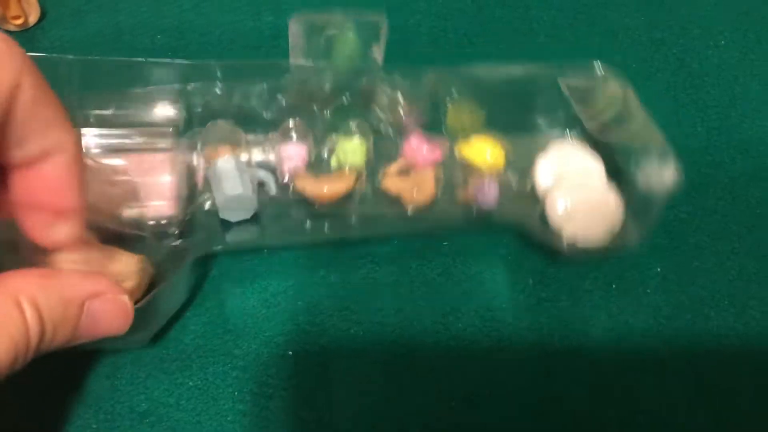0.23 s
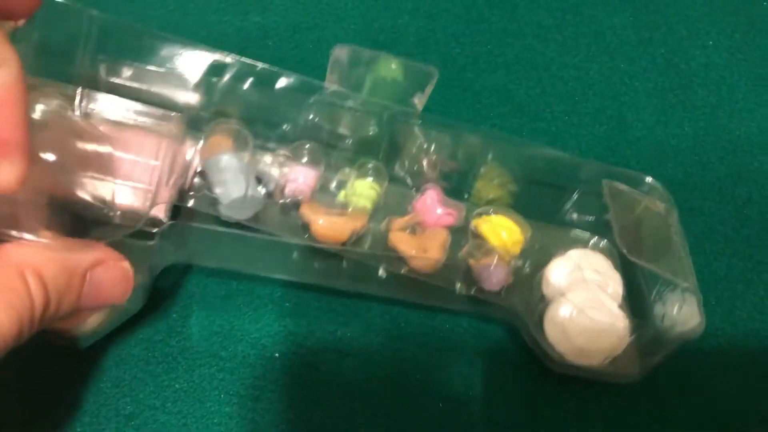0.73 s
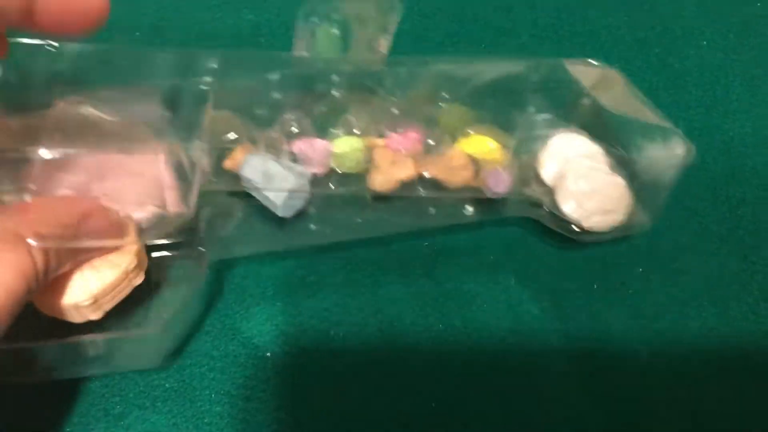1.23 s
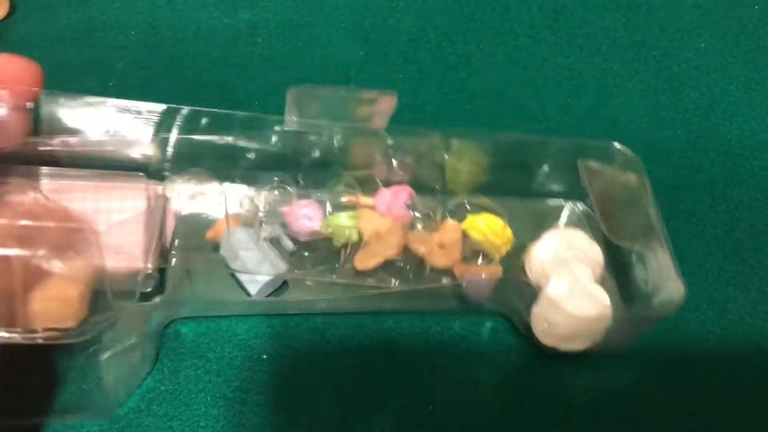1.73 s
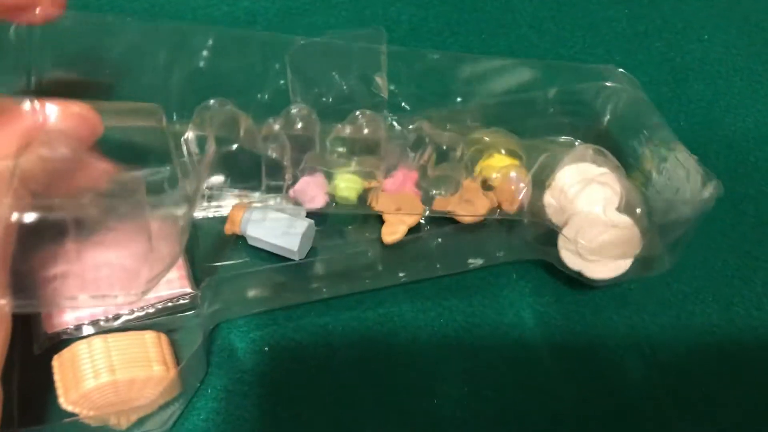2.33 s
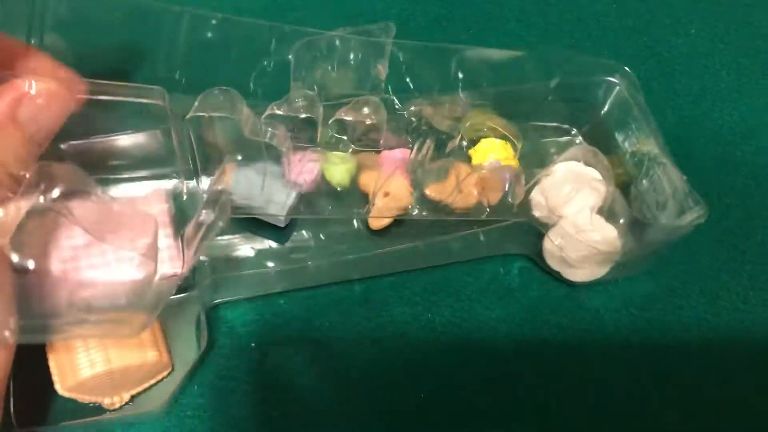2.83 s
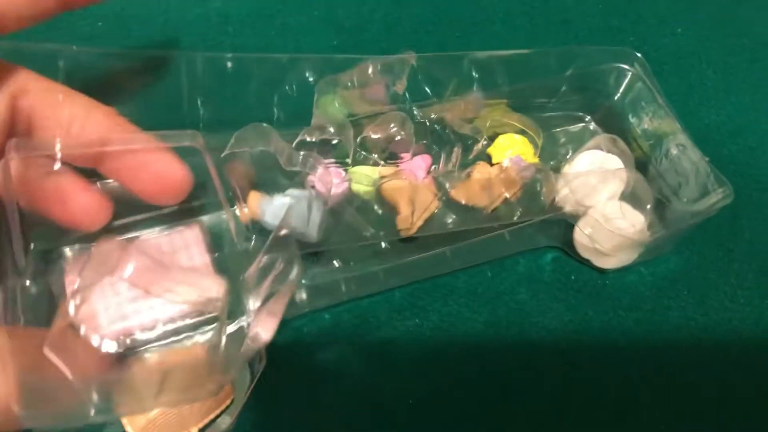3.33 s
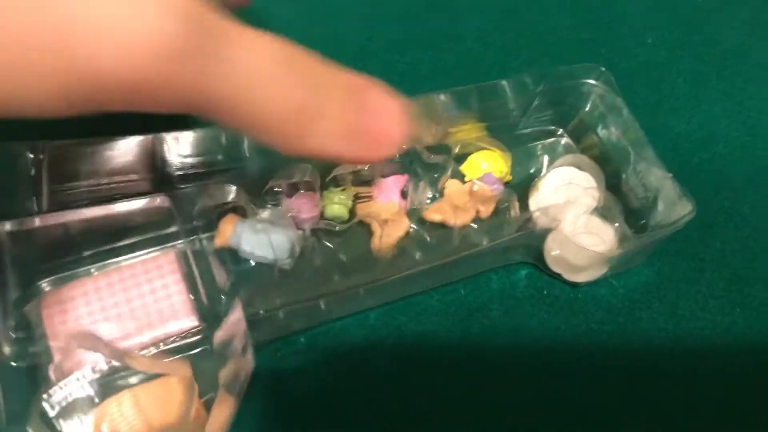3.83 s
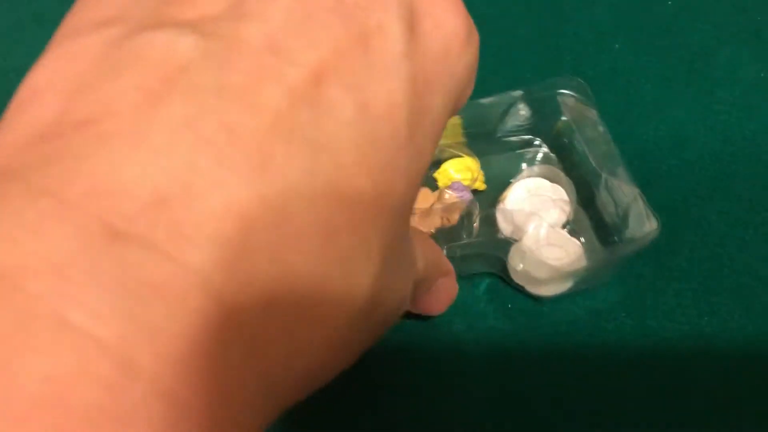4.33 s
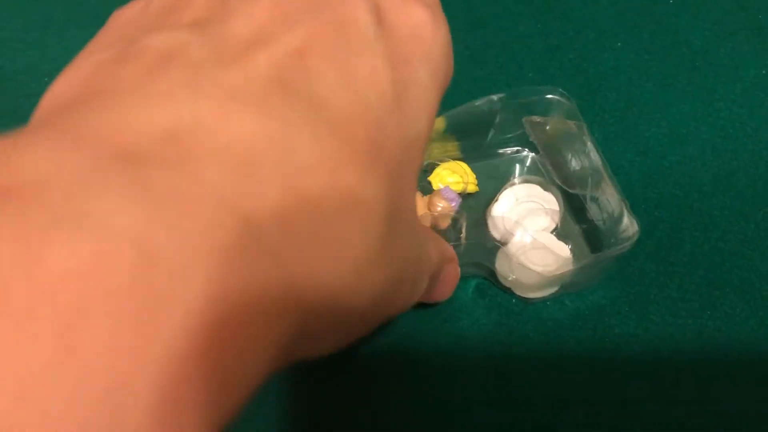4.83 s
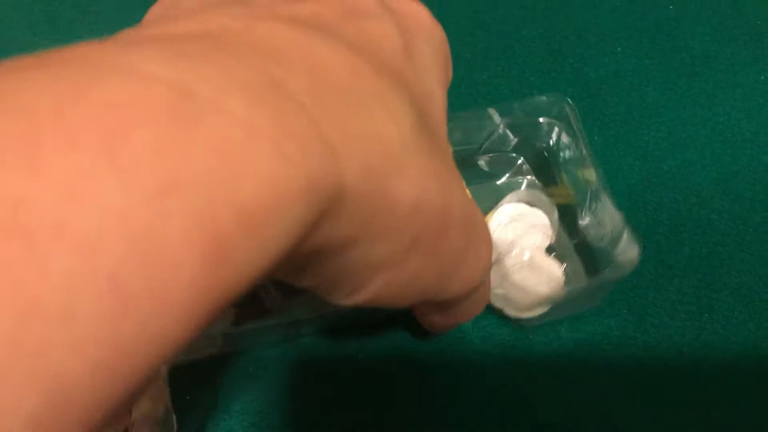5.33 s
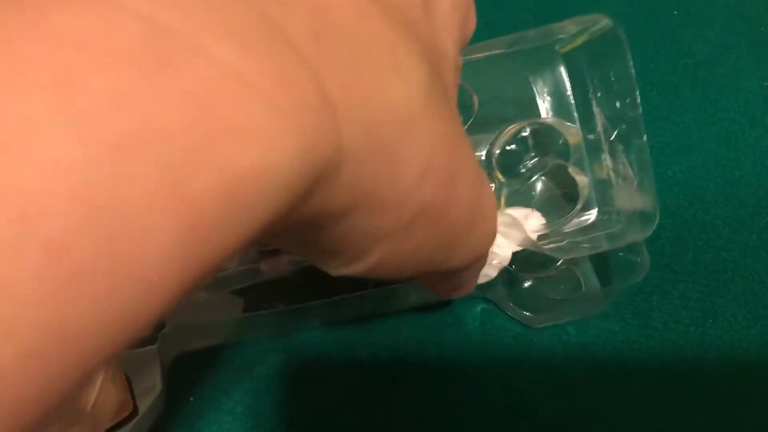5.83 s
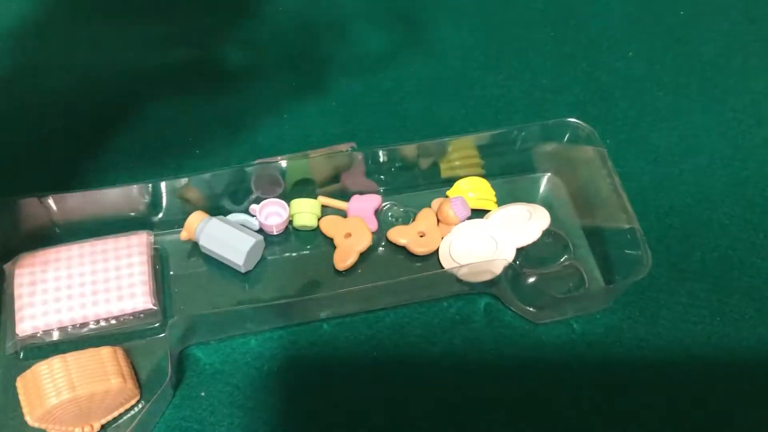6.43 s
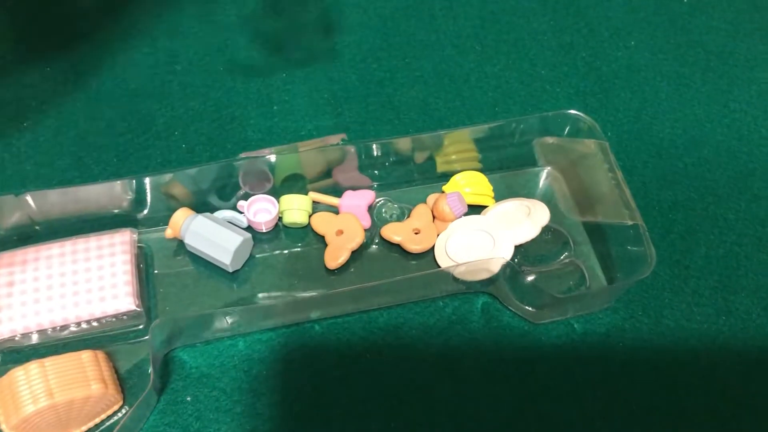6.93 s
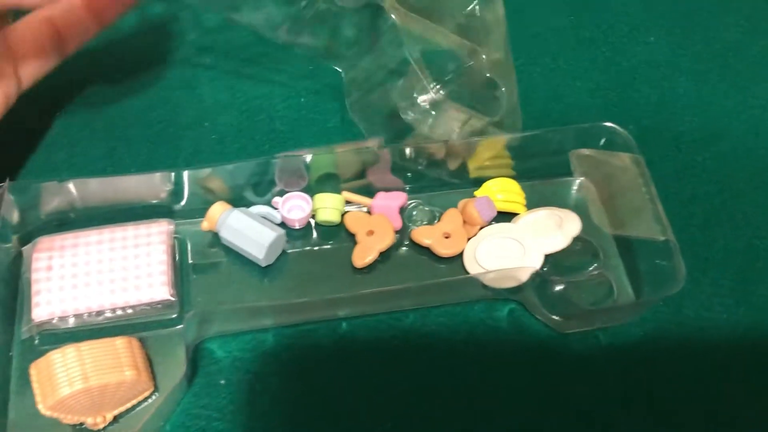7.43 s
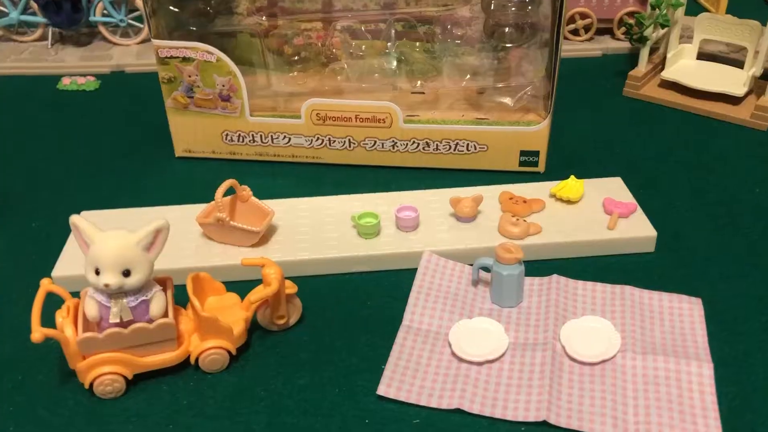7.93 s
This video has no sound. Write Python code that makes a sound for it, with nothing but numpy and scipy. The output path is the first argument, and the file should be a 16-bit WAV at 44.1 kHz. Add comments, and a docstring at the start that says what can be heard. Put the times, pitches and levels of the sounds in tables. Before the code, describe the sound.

A stiff, thin plastic sheet crackles and buckles under fingers on a felt-covered table, heard dry and close with little room tail. Bright pops with a short hollow ring stand out from uneven crinkling. The handling grows sparse, picks up again as the lid is pried loose, then nearly stops. Faint air and a low drone lie beneath; a brief scuff and dull knock come last.

```python
"""Prising open a plastic blister tray

Hands prise the lid off a thin plastic tray of small toy pieces, on a felt-covered table in a small room.
The sheet buckles: sharp snaps are bursts of dense modes with a ringing pocket, crinkles are many tiny bursts.
Its rims stick, slip and squeak as pulses into a resonance, and the loose lid slides as comb-filtered noise.
A click of shaped noise with a short hollow knock of a few modes ends the handling, over faint air and drone."""
import sys
import numpy as np
from scipy import signal
from scipy.fft import rfft, irfft, next_fast_len
from scipy.io import wavfile
from scipy.ndimage import uniform_filter1d

SR = 44100
rng = np.random.default_rng(int(sys.argv[2]) if len(sys.argv) > 2 else 0)


def bounce(signal):
    """Save signal as a 16-bit WAV file at the path given by the first command-line argument."""
    frames = np.transpose(np.atleast_2d(signal))
    limited = np.clip(frames, -1, 1)
    pcm = np.round(limited * 32767).astype(np.int16)
    wavfile.write(sys.argv[1], SR, pcm)


N = 360341
TIME = np.arange(N) / SR
BANDS = np.geomspace(90, 15000, 16)  # centres of the sheet's frequency bands, Hz

# The hollow note of the part under the fingers. Each row: time in seconds, pitch in Hz.
HOLLOW_NOTE = [(.45, 1810), (.7, 1110), (1.05, 1310), (1.15, 2160), (1.9, 1310), (2.3, 1780), (2.8, 1300),
               (3.02, 1640), (3.6, 1260), (5.1, 1230), (5.35, 1520), (5.5, 1222), (7.3, 940)]


def amp(db):
    """Decibels to gain."""
    return 10 ** (np.asarray(db) / 20)


def unit(x):
    """Scales to rms 1."""
    return x / np.sqrt(np.mean(x ** 2) + 1e-30)


def read(points, hz):
    """Reads a table on a log-frequency axis."""
    f, value = np.transpose(points)
    return np.interp(np.log(hz + 1), np.log(f + 1), value)


def curves(rows):
    """Each column of a table of times, at every sample."""
    s, *columns = np.transpose(rows)
    return [np.interp(TIME, s, column) for column in columns]


def add(mix, s, sound):
    """Mixes a sound in at a time."""
    part = mix[max(round(s * SR), 0):][:len(sound)]
    part += sound[:len(part)]


def shares(centres, hz):
    """Overlapping triangles on log frequency, one a centre, that sum to 1."""
    return np.array([read(np.c_[centres, peak], hz) for peak in np.eye(len(centres))])


def coloured(x, spectrum):
    """Gives a signal a spectrum."""
    padded = next_fast_len(N)
    gain = amp(read(spectrum, np.fft.rfftfreq(padded, 1 / SR)))
    return irfft(rfft(x, padded) * gain, padded)[:N]


def resonate(x, hz, width):
    """A resonance of gain 1 at its centre: one complex pole, the width in Hz."""
    r = np.exp(-np.pi * width / SR)
    return 2 * signal.lfilter([1 - r], [1, -r * np.exp(2j * np.pi * hz / SR)], x).real


def swell(t, s, rise_s, hold_s, release_s):
    """Level in dB of a hand movement: it builds up until s, holds, and relaxes."""
    fall_db, shape = 22.5, 1.218  # drop one rise or release time away; a shape above 1 rounds the peak
    away = np.maximum((s - t) / rise_s, (t - s - hold_s) / release_s)
    return -fall_db * np.clip(away, 0, 8) ** shape


def background():
    """Faint room air as coloured noise, and a low drone as narrow noise that wavers in level."""
    # Low wavering drone. Each row: resonance in Hz, width of each of two passes in Hz, level in dB.
    hum = [(67.5, 4.9, -67.5), (238, 11, -74)]
    # How the drone swells and sinks. Each row: time in seconds, gain in dB.
    drone_level = [(0, 7), (1, 6.5), (2.6, 0.5), (3.2, -1), (4.2, -1), (5.5, 4.5), (6.4, -2.5), (7.4, 0),
                   (8.17, -3.5)]
    # Spectrum of the air. Each row: frequency in Hz, relative density in dB per Hz.
    air_colour = [(25, -23), (60, -2.5), (130, -3.5), (250, -11.5), (500, -14), (1000, -18), (3200, -26.5),
                  (8000, -31), (16000, -39.5)]
    air_db = -69
    drone = np.zeros(N)
    for hz, width, db in hum:
        narrow = resonate(resonate(rng.standard_normal(N), hz, width), hz, width)
        drone += amp(db) * unit(narrow)
    air = unit(coloured(rng.standard_normal(N), air_colour))
    return drone * amp(curves(drone_level)[0]) + amp(air_db) * air


def band_gains(thump_db, crack_db, fizz_db):
    """The sheet's spectrum, tinted, as gains (bands, moments) of total power 1."""
    # Spectrum of the buckling sheet. Each row: frequency in Hz, relative density in dB per Hz.
    sheet_colour = [(35, -41), (60, -12), (91, -13.5), (268, -10), (354, -8), (398, -8), (593, -11),
                    (1110, 1.5), (1280, -1), (2520, -4), (3190, -2.5), (5330, -9.5), (6430, -10.5),
                    (9350, -16), (16000, -17.5)]
    # Where the tints act: thump, body (two points), crack and fizz, in Hz.
    tint_hz = [450, 1000, 2000, 4000, 10000]
    body_db = np.zeros_like(thump_db)
    tints = np.array([thump_db, body_db, body_db, crack_db, fizz_db])
    level_db = shares(tint_hz, BANDS).T @ tints + read(sheet_colour, BANDS)[:, None]
    gain = amp(level_db) * np.sqrt(np.gradient(BANDS))[:, None]  # density to band level
    return gain / np.linalg.norm(gain, axis=0)


def buckles(ring_s, damping=0.6, rise_cycles=0.68, rise_share=0.086, after_db=-29, after_s=0.012, size=2048):
    """Bursts (bursts, bands, samples) of energy 1 a band: dense sheet modes, the high ones starting and dying first."""
    t, hz, ring_s = np.arange(size) / SR, BANDS[:, None], ring_s[:, None, None]
    split = np.sqrt(shares(BANDS, np.fft.rfftfreq(size, 1 / SR)))
    noise = rng.standard_normal((len(ring_s), len(BANDS), size))
    modes = irfft(rfft(noise) * split)
    life = ring_s * (np.maximum(hz, 700) / 2500) ** -damping
    rise = 1 - np.exp(-(t / (rise_cycles / hz + rise_share * ring_s)) ** 2)
    decay = np.exp(-t / life) + amp(after_db) * np.exp(-t / after_s)
    burst = modes * rise * decay
    return burst / np.linalg.norm(burst, axis=2, keepdims=True)


def flexing(size=32):
    """How hard the sheet is worked (s, level dB, thump dB, brightness dB): pushes add up, the strongest weigh most."""
    # Pushes of the fingers, each building up and relaxing. Each row: peak in seconds, crinkle level in dB,
    # build-up in seconds, relaxing in seconds, thump in dB, brightness in dB.
    pushes = [(0.21, -41.5, 0.097, 0.23, -1, -7), (0.432, -34.5, 0.12, 0.17, 2.5, -1.5),
              (0.64, -47, 0.13, 0.37, 4, -3.5), (0.99, -37, 0.18, .12, -1, -3.5),
              (1.048, -27, 0.013, 0.18, 0, 0.5), (1.15, -34, 0.17, 0.12, -11, -9.5),
              (1.305, -47.5, 0.043, 0.045, -7, -13), (1.39, -41.5, 0.02, 0.25, 2, -1),
              (1.69, -34.5, 0.16, 0.16, 1.5, -5.5), (1.891, -29, 0.21, 0.13, 2.5, 1.5),
              (2.12, -38.5, 0.15, .1, 2, -7), (2.155, -23.5, 0.018, 0.15, -5, -6),
              (2.29, -34, .06, 0.38, -1.5, -5.5), (2.52, -42, 0.045, .21, 3, -7),
              (2.755, -36.5, 0.024, 0.12, 3.5, -12), (2.881, -42, 0.085, 0.023, 8, 3),
              (3.04, -43, 0.23, 0.12, 4, -6.5), (3.125, -46.5, 0.064, .16, 3, -8),
              (3.422, -50, 0.19, 0.14, 7, -10.5), (3.555, -57, 0.011, 0.12, -4, -11),
              (3.654, -44.5, 0.029, 0.093, 1.5, -11.5), (3.761, -36, 0.036, 0.11, 5, -6.5),
              (4.185, -45.5, 0.057, 0.23, 3, -10), (4.35, -47, .03, 0.16, 2, -7),
              (4.5, -46, 0.23, 0.072, 2, -10), (4.62, -39, 0.088, 0.059, 6, -2),
              (4.71, -42, 0.17, 0.27, -0.5, -5.5), (4.891, -39.5, 0.038, 0.12, 14, -9),
              (5.06, -43, 0.13, 0.052, 9, -9), (5.14, -45.5, 0.18, 0.68, 3.5, -7),
              (5.32, -42.5, 0.054, .15, 4, -6), (5.409, -37, 0.048, .16, 6, -5),
              (5.458, -26, 0.014, .18, 4.5, -2.5), (5.6, -34.5, 0.089, .17, 3.5, -0.5),
              (5.746, -43.5, 0.083, 0.079, 15, 3), (6.081, -38.5, 0.066, 0.06, 5.5, 4),
              (6.14, -55, 0.52, 0.13, 7.5, -3.5), (6.496, -52.5, 0.11, 0.089, 18, -3.5),
              (6.66, -55.5, 0.1, 0.17, 8.5, -6), (6.933, -48, .13, 0.076, 11.5, 4),
              (7.099, -54.5, 0.037, 0.3, 12, 2), (7.28, -52.5, 0.25, 0.31, 10.5, -3.5),
              (7.383, -44, 0.068, 0.032, 18, 3), (7.8, -57.5, 0.43, 0.11, 11.5, -1)]
    # When the held tray rustles faintly. Each row: start in seconds, end in seconds.
    held_spans = [(0, 3.18), (4.16, 5.8)]
    held_db = -58
    t = TIME[::size]
    power = np.array([amp(db + swell(t, s, build_s, 0, relax_s)) ** 2
                      for s, db, build_s, relax_s, *_ in pushes])
    thump_db, bright_db = np.transpose(pushes)[-2:] @ power / power.sum(0)
    holding = sum(1. * (t >= start) * (t < end) for start, end in held_spans)
    held = uniform_filter1d(holding, size=60) * amp(held_db) ** 2
    return t, 10 * np.log10(power.sum(0) + abs(held)), thump_db, bright_db


def crinkle(flex, creases_per_s=750, ring_s=0.0024, thinning=.45, count=20):
    """Many tiny buckles of unequal size, as loud and as bright as the flexing makes them."""
    # How unequal the creases are: small is even rubbing, large is separate ticks.
    # Each row: time in seconds, spread in dB.
    grain = [(0, 5), (.43, 2), (.7, 5), (1.08, 2), (1.45, 4.5), (2.2, 3.5), (3.8, 5), (4.9, 3), (5.6, 3),
             (6.9, 2), (7.2, 3.5), (7.7, 0.4)]
    crack_tint_db, crack_share = 1.1, 0.73  # the crack's own tint, and its share of the brightness
    spread_db, = curves(grain)
    # even rubbing is made of more and smaller slips than separate ticking
    rate = creases_per_s * np.exp(thinning * (3.5 - spread_db))
    sizes = amp(spread_db * np.minimum(rng.exponential(1, N), 4))
    clicks = sizes * (rng.random(N) < rate / SR)
    # the creases share out the energy that the fingers put in
    energy = uniform_filter1d(uniform_filter1d(clicks ** 2, size=1500), size=900)
    clicks /= np.sqrt(abs(energy) + 1e-6)
    # each crease sounds one of a few different bursts
    choice, padded = rng.integers(0, count, N), next_fast_len(N)
    grains = (buckles(np.full(count, ring_s)) * np.sqrt(np.gradient(BANDS))[:, None]).sum(1)
    creases = sum(signal.oaconvolve(clicks * (choice == k), g)[:N] for k, g in enumerate(grains))
    texture = rfft(creases, padded)
    # every band follows the flexing at its own level
    s, level_db, thump_db, bright_db = flex
    gains = band_gains(thump_db, crack_tint_db + crack_share * bright_db, bright_db)
    band_db = 20 * np.log10(gains) + level_db
    out = np.zeros(N)
    for band, db in zip(shares(BANDS, np.fft.rfftfreq(padded, 1 / SR)), band_db):
        out += unit(irfft(texture * band, padded)[:N]) * amp(np.interp(TIME, s, db))
    return np.sqrt(2 / 3) * out  # makes up for the overlap of the bands


def hollow(x, width_hz=400, ring_db=-2.5, direct_db=-2.5):
    """A broad resonance that moves as the fingers shift their grip."""
    hz, = curves(HOLLOW_NOTE)
    turn, r = np.exp(2j * np.pi * np.cumsum(hz) / SR), np.exp(-np.pi * width_hz / SR)
    # shift the moving note down to 0 Hz, smooth there, and shift back
    ring = 2 * (turn * signal.lfilter([1 - r], [1, -r], x / turn)).real
    return amp(direct_db) * x + amp(ring_db) * ring


def snaps(rows, pocket_life=0.79, size=2048):
    """The sheet pops through from one shape to another, and the pocket that popped rings for a few cycles."""
    crack_tint_db, crack_share = 0.5, 0.4  # the crack's own tint, and its share of the brightness
    s, level_db, thump_db, bright_db, ring_s, pocket_hz, share = np.transpose(rows)
    share, t = np.clip(share, 0, .9)[:, None], np.arange(size) / SR
    # so thin a sheet can push out only a little bass
    thump_db = np.minimum(thump_db, 10)
    gains = band_gains(thump_db, crack_tint_db + crack_share * bright_db, bright_db)
    burst = np.einsum("be,ebt->et", gains, buckles(ring_s))
    # the pocket swells a moment after the crack and dies about as fast
    life = pocket_life * ring_s[:, None]
    envelope = np.exp(-t / life) * (1 - np.exp(-t / (0.45 * life)))
    ring = np.sin(2 * np.pi * pocket_hz[:, None] * t) * envelope
    ring /= np.linalg.norm(ring, axis=1, keepdims=True)
    pops = np.sqrt(1 - share) * burst + np.sqrt(share) * ring
    span = np.sqrt(.005 * SR)  # levels are stated over 5 ms
    out = np.zeros(N)
    for start, db, pop in zip(s, level_db, pops):
        add(out, start, amp(db) * span * pop)
    return out


def ticks(flex, count=160):
    """Rows of small snaps at chance moments of firm flexing, set by the crinkle and near the hollow note."""
    per_s, from_db = 6, -56  # a sheet worked more gently than from_db does not tick
    over_db, limit_db, scatter_db = 6, -40, 1.4  # above the crinkle, limit before scatter, scatter
    bright_over_db, ring_s, pocket_share, detune = 6.5, 0.0027, 0.43, .14  # detune is in log pitch
    t, level_db, thump_db, bright_db = flex
    s, chance = np.cumsum(rng.exponential(1, count)) / per_s, rng.standard_normal((count, 3))
    s = s[np.interp(s, t, level_db, right=-np.inf) > from_db]
    loud, bright, pitch = chance[:len(s)].T
    level = np.minimum(np.interp(s, t, level_db) + over_db, limit_db) + scatter_db * loud
    thump = np.interp(s, t, thump_db)
    brightness = np.interp(s, t, bright_db) + bright_over_db + 2 * scatter_db * bright
    hz = np.interp(s, *np.transpose(HOLLOW_NOTE)) * np.exp(detune * pitch)
    return np.c_[s, level, thump, brightness, np.full(len(s), ring_s), hz, np.full(len(s), pocket_share)]


def tray(x, trim_db=-1):
    """The moulded shell rings a little at its own resonances."""
    # Resonances of the shell. Each row: frequency in Hz, width in Hz, gain against the direct sound in dB.
    shell_modes = [(1120, 90, -11), (1330, 19, -16.5), (1600, 72, -15), (2020, 110, -15.5),
                   (2720, 38, -5.5), (3440, 32, -14.5), (5000, 60, -14), (6300, 34, -17.5)]
    ringing = sum(amp(db) * resonate(x, hz, width) for hz, width, db in shell_modes)
    return amp(trim_db) * (x + ringing)


def squeaks(jitter=0.3):
    """Rims stick and slip: uneven slips ring one stiff corner of the rim."""
    # Each row: start in seconds, length in seconds, slips per second, ring in Hz, width in Hz, level in dB.
    rim_slips = [(1.872, 0.032, 450, 6300, 250, -42), (1.915, 0.026, 340, 6000, 250, -45.5),
                 (2.179, .003, 710, 10640, 200, -38), (2.748, 0.049, 125, 3810, 282, -37),
                 (2.823, .045, 200, 3760, 220, -45.5), (2.921, .016, 300, 3860, 250, -50.5),
                 (3.018, 0.022, 310, 2470, 500, -48.5), (5.481, 0.01, 590, 5700, 300, -37)]
    out = np.zeros(N)
    for s, length, rate, hz, width, db in rim_slips:
        n = int(length * SR)
        slips = np.cumsum(np.exp(jitter * rng.standard_normal(64))) * SR / rate
        at = (slips - slips[0]).astype(int)
        drive = np.zeros(n + SR // 100)  # 10 ms more to ring out
        drive[at[at < n]] = 1
        add(out, s, amp(db) * unit(resonate(drive, hz, width)))
    return out


def knock():
    """Two dull blows, the tray dropping on the felt and the hollow knock, ring a few low modes."""
    # Each row: start in seconds, mode in Hz, level before the rise in dB, t60 in seconds, rise in seconds.
    blow_modes = [(2.146, 63, -40, 0.33, 0.012), (2.146, 127, -29, 0.094, .004),
                  (7.859, 429, -23, 0.071, 0.0035), (7.859, 474, -54.5, 0.65, 0.0087),
                  (7.86, 250, -30, 0.021, 0.0017), (7.857, 733, -35, .025, 0.0026)]
    out, t = np.zeros(N), np.arange(SR // 3) / SR
    for s, hz, db, t60, rise in blow_modes:
        envelope = amp(db - 60 * t / t60) * (1 - np.exp(-(t / rise) ** 2))
        add(out, s, envelope * np.sin(2 * np.pi * hz * t))
    return out


def slide(echo=0.37, grit_db=2, fizz_hz=7000, count=3):
    """Fine friction of the lid; echoes between lid and table comb the hiss, and the comb sinks as it moves."""
    # Slides of the lid. Each row: time of reaching full level in seconds, hold at full level in seconds,
    # rise before it in seconds, level in dB, echo delay between lid and table at that time in ms, extra fizz in dB.
    lid_slides = [(6.451, 0.021, 0.0038, -55, 0.75, 2), (6.767, 0.082, .08, -45, 1.55, -24),
                  (7.665, .075, 0.008, -53, 1.7, 3)]
    # Spectrum of the friction. Each row: frequency in Hz, relative density in dB per Hz.
    friction_colour = [(120, -45.5), (200, -5), (316, -30.5), (519, -4), (722, -11), (1160, 3.5),
                       (1770, -11.5), (2250, -2.5), (4200, -11), (4860, -6), (16000, -28)]
    # the hiss dies when the lid stops; the gap under the lid opens as it moves
    release_s, delay_ms_per_s = 0.036, 3.5
    grit = unit(uniform_filter1d(rng.standard_normal(N), size=64))
    rub = unit(coloured(rng.standard_normal(N) * amp(grit_db * grit), friction_colour))
    fizz = signal.sosfiltfilt(signal.butter(1, fizz_hz, "high", fs=SR, output="sos"), rub)
    bounces, out = echo ** np.arange(count + 1), np.zeros(N)
    for s, hold_s, rise_s, level_db, echo_ms, fizz_db in lid_slides:
        delay_s = (echo_ms + delay_ms_per_s * (TIME - s)) / 1000
        hiss = rub + amp(fizz_db) * fizz
        combed = sum(g * np.interp(TIME - k * delay_s, TIME, hiss) for k, g in enumerate(bounces))
        out += combed * amp(level_db + swell(TIME, s, rise_s, hold_s, release_s))
    return out / np.linalg.norm(bounces)


def click():
    """A dry click close by: shaped noise, a scuff that swells into it."""
    # Each row: time in seconds, level in dB.
    scuff_level = [(7.838, -89), (7.844, -50.5), (7.849, -48), (7.8528, -28), (7.855, -54), (7.858, -41),
                   (7.86, -90)]
    # Each row: frequency in Hz, relative density in dB per Hz.
    scuff_colour = [(200, -29), (600, -6), (1000, 9), (1400, -21), (2000, -7), (2750, 4.5), (3600, -12),
                    (5000, -4), (8000, -14), (13000, -9), (16000, -22)]
    level_db, = curves(scuff_level)
    sounding = (TIME > scuff_level[0][0]) * (TIME < scuff_level[-1][0])
    return unit(coloured(rng.standard_normal(N), scuff_colour)) * amp(level_db) * sounding


def room(x, wet_db=-14.0, gap_s=0.00067):
    """A weak diffuse tail that decays at a different rate at each frequency, the bass slowest."""
    # Each row: frequency in Hz, t60 in seconds.
    decay_times = [(150, 0.9), (1000, 0.13), (4000, 0.1), (15000, 0.12)]
    hz, t, z = signal.stft(rng.standard_normal(SR // 2), SR, nperseg=256)
    decay = amp(-60 * t / read(decay_times, hz)[:, None])
    tail = signal.istft(z * decay, SR, nperseg=256)[1]
    tail *= 1 - np.exp(-(np.arange(len(tail)) / SR / gap_s) ** 2)
    return x + amp(wet_db) * signal.oaconvolve(x, tail / np.linalg.norm(tail))[:N]


def scene():
    """The handled plastic in the room."""
    # The sheet pops through. Each row: start in seconds, level over 5 ms in dB, thump in dB, brightness in dB,
    # ring time in seconds, pitch of the pocket that pops in Hz, the pocket's share of the energy (0-1).
    sheet_snaps = [(0.0892, -42.5, -3, -11, 0.0048, 1510, 0.1), (0.1523, -41, -13, -16, .0024, 2020, .75),
                   (0.1819, -40, -11, -6, .0053, 1570, 0.3), (0.2004, -31, -23, -4, .0028, 1980, 0.25),
                   (0.2797, -38, -14, -5, 0.0024, 2400, 0.2), (0.2904, -37, -4, -3, 0.0015, 1490, 0.2),
                   (0.2981, -38, -11, -6, 0.00077, 2570, 0.75), (0.3261, -36, -7, -2, 0.0017, 2430, 0.65),
                   (0.3433, -36, -12, 3, 0.0047, 2480, 0.5), (0.3738, -36.5, -6, 19, 0.0027, 8950, 0.24),
                   (0.4149, -26, 3, -4, 0.0047, 1180, .25), (0.5164, -37, 10, 4, .0037, 1230, 0.35),
                   (0.5599, -38, -15, -6, 0.0014, 1870, 0.66), (0.6425, -40, 10, 24, 0.0026, 1250, 0.1),
                   (0.7214, -32.5, 13, 23, .0038, 1490, 0.17), (0.815, -40, -18, -7, 0.0058, 2070, 0.07),
                   (0.8906, -14, -9.5, 11.5, 0.0031, 1560, 0.03), (1.0189, -32, 9, -6, 0.0018, 2300, 0.7),
                   (1.0388, -21.5, 0, 1, 0.0023, 1360, 0), (1.0414, -18.5, 7, -0.5, 0.0098, 1167, 0.13),
                   (1.1478, -25, -13, -6, 0.0035, 2350, 0.52), (1.2086, -32.5, -19, -1, 0.0049, 1690, 0.5),
                   (1.2257, -33.5, -14, 0, 0.0041, 2760, 0.37), (1.238, -36, -18.5, -0.5, .0029, 1670, 0.6),
                   (1.3668, -43.5, -7, -6.5, 0.003, 1030, 0.3), (1.481, -38.5, -12, 14, 0.0029, 3960, .1),
                   (1.5447, -33, -15, 6, 0.0031, 2810, 0.06), (1.5568, -38, -3.5, 2, .0054, 1500, 0.4),
                   (1.5753, -36.5, -12, 8, .0016, 3000, 0.2), (1.6202, -29, -5, -5, 0.0041, 2470, 0.35),
                   (1.6334, -17, 6.5, 12.5, 0.0015, 2350, 0.51), (1.6721, -37, -1, 38, .0016, 11400, 0.3),
                   (1.7804, -29, 5, 5, 0.026, 1063, .03), (1.8345, -37, -12, -11, 0.0019, 1170, .2),
                   (1.8499, -24.5, 4, -27, 0.0042, 2440, 0.55), (1.8816, -21, 12, 22, 0.0045, 6050, .83),
                   (2.13, -26.5, -1, 7, 0.0017, 1380, .32), (2.1332, -15.5, 3.5, 0, 0.0084, 1780, 0.22),
                   (2.1358, -16.5, -17, -3, 0.012, 2017, 0.34),
                   (2.1438, -15.5, -23, -6.5, 0.0023, 1480, 0.2), (2.1593, -25, 5, -1, 0.015, 1410, .32),
                   (2.176, -31, -4, 4, .0063, 1600, .8), (2.1917, -26, -14, -12, .0033, 1550, .46),
                   (2.2471, -34, -9, -19, 0.0031, 1770, 0.3), (2.2617, -30, -13, -11, 0.0011, 1760, 1),
                   (2.2704, -32, -7, -12, 0.0017, 1660, 0.9), (2.2786, -32.5, -12, -9, .0015, 2370, 1),
                   (2.2959, -28, -9, -3, .0049, 1730, 1), (2.3116, -22.5, -4, 6, 0.0065, 1200, 0.12),
                   (2.4978, -35, 0, -3, 0.0051, 3200, 0.16), (2.589, -36, -20, -10, .0038, 1710, 0.25),
                   (2.6286, -38.5, 3, -7, 0.0034, 1360, 0), (2.6548, -41, 8, -1, .0023, 3030, 0.57),
                   (2.717, -37, 4, -8, .002, 1720, 0.5), (2.7411, -32, -5, -8, .0032, 1170, .5),
                   (2.7529, -32.5, -11, 1, .0026, 1220, 0.54), (2.7747, -32, -12, 5, .0012, 1520, .5),
                   (2.7832, -29, -8, 2, 0.0012, 1400, 0.54), (2.7951, -29, -4, -3, 0.0076, 1290, 0.2),
                   (2.9222, -34.5, -9, -4, .0094, 1450, 0.43), (3.0013, -39, -4, -13, .002, 2120, 0.7),
                   (3.1037, -39, 6, 4, .0039, 1430, 0.75), (3.1637, -36, -11, -12.5, 0.0039, 1370, 0.1),
                   (3.3658, -41, 5, 0, 0.0026, 1780, 0.44), (3.4222, -38.5, -5, -3, 0.0025, 1360, 0.72),
                   (3.6437, -39.5, 1, -14, 0.004, 1270, 0.3), (3.7489, -28.5, 6.5, -1, .0039, 4680, .23),
                   (4.129, -46, 2, -5, .013, 1250, .25), (4.1668, -35.5, 3, -1, 0.0017, 1390, 0.4),
                   (4.1842, -40, 6.5, 3.5, .0037, 1250, 0), (4.2994, -38, 3, -3, 0.0056, 1640, 0.72),
                   (4.338, -37, -10, -6, 0.0077, 1346, 0.9), (4.3863, -44, -3.5, -5, .0035, 1220, 0.85),
                   (4.6077, -25, 8, -9.5, 0.0033, 1030, 0.46), (4.662, -33.5, 6, -6, 0.0079, 1350, 0.6),
                   (4.6969, -12, -0.5, 2, 0.0038, 1243, .43), (4.8182, -42, 10, 9, .0039, 1170, 0.3),
                   (4.8481, -29.5, -20, 6, 0.0023, 1800, 0.15), (4.9811, -42.5, 0, 0, 0.003, 1420, 0.83),
                   (5.1391, -33.5, 1.5, -11, 0.0026, 2610, 0.16), (5.1985, -38, 3, 6, .0036, 1150, 0.05),
                   (5.3009, -31, 9, -16, 0.0037, 2520, 0.1), (5.314, -33, -18, -2, 0.007, 2670, 0.24),
                   (5.3483, -30, -1, -5.5, .0085, 1606, .1), (5.4525, -15, 9, 9, .0069, 1415, 0.18),
                   (5.4787, -19.5, -14, -24, .0023, 5520, 0.88), (5.4825, -21.5, 11, -4, 0.01, 1600, 0.04),
                   (5.5627, -29.5, -8, 16, .0046, 5240, .13), (5.7457, -31, 5, -5, 0.0034, 1080, .14),
                   (6.0514, -31.5, 7, 3.5, .013, 1090, 0.02), (6.377, -56.5, 4.5, -1, .0033, 1565, 0.33),
                   (6.9051, -37, -7, 5.5, .0039, 1925, 0.23), (7.001, -51.5, 10, -1, .0039, 1120, 0),
                   (7.1573, -46, -9, 2, 0.0072, 1870, 0.13), (7.1777, -51, 10, 0, .0024, 1050, .26),
                   (7.3336, -43, -12, -12, 0.0013, 1120, 0), (7.4192, -45.5, -3, 0, 0.0066, 1170, 0),
                   (7.5983, -53, -4, 6, .0049, 908, 0.3)]
    flex = flexing()
    sheet = hollow(crinkle(flex)) + snaps(sheet_snaps) + snaps(ticks(flex))
    rubbing = squeaks() + slide()
    close_by = knock() + click()  # these two stay without room tail
    return (room(tray(sheet) + rubbing) + close_by + background())[None]


def record(dry, low_cut_hz=52, edge_hz=16100):
    """The microphone's bass roll-off, then the recorder's band limit."""
    thin = signal.sosfilt(signal.butter(3, low_cut_hz, "high", fs=SR, output="sos"), dry)
    band_limit = signal.firwin(255, edge_hz, window=("kaiser", 9), fs=SR)
    return signal.oaconvolve(thin, band_limit[None], "same")


dry = scene()
out = record(dry)
bounce(out)
```